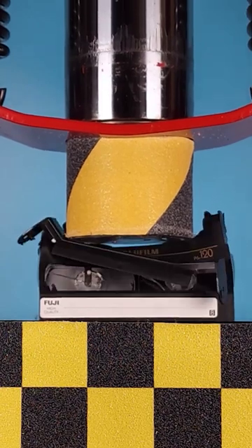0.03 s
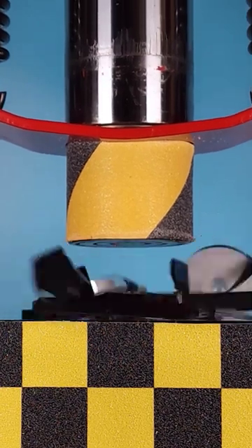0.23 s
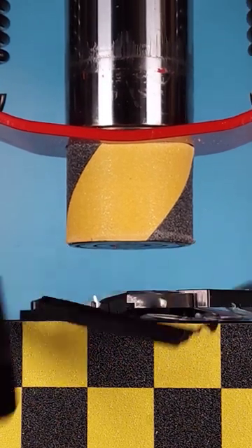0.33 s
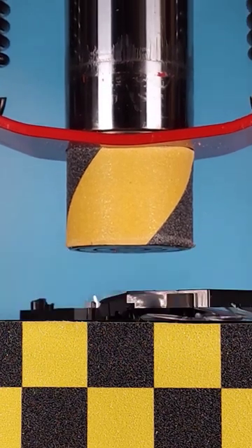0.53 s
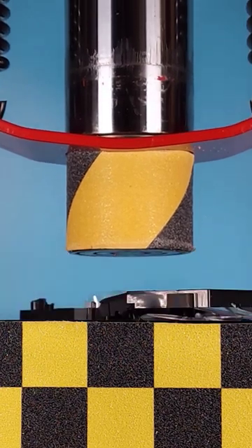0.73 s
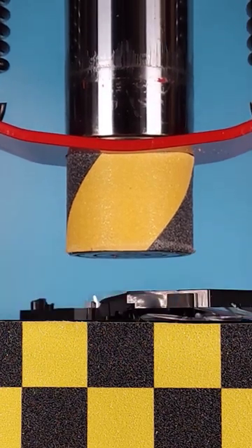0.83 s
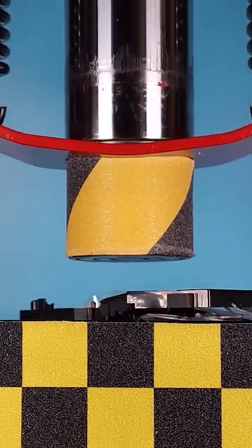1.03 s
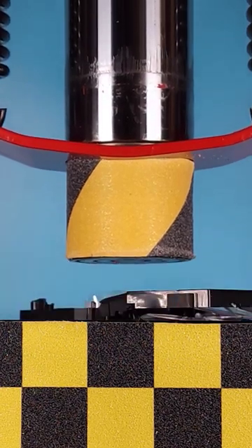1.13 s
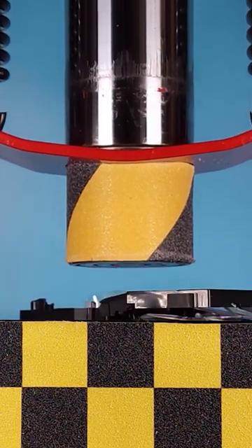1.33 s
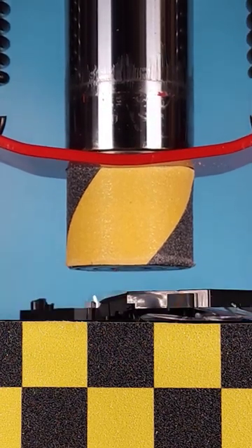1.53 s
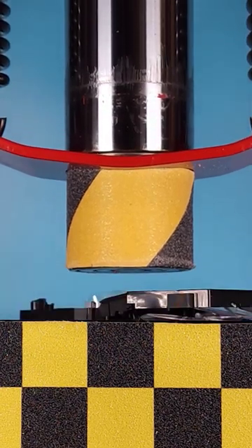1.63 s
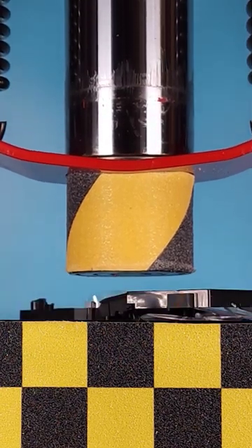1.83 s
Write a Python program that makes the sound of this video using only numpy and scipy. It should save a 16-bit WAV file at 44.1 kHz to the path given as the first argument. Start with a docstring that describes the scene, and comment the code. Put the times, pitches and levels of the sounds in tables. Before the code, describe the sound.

Sharp crack of a plastic cassette shattering in a hydraulic press, over a steady pump whine.

```python
"""A plastic cassette bursts under a hydraulic press in a workshop. Each crack is a snap and a run of
tiny fractures that ring the shell. It gives way with a thud, shards scatter, pieces slap onto the
steel bed and the frame rumbles on. The flattened wreck keeps ticking, clacking and pinging under the
ram, while the pump behind it hums, whines and hisses, slowly growing louder."""
import sys
import numpy as np
from scipy import signal
from scipy.fft import rfft, irfft
from scipy.io import wavfile
from scipy.ndimage import uniform_filter1d

SR = 44100
rng = np.random.default_rng(int(sys.argv[2]) if len(sys.argv) > 2 else 0)


def output_pcm(signal):
    """Save a mono or channel-first signal as 16-bit PCM at the path in sys.argv[1].

    Samples are clipped to [-1, 1] before scaling.
    """
    pcm = np.clip(np.atleast_2d(signal).T, -1, 1) * 32767
    wavfile.write(sys.argv[1], SR, np.round(pcm).astype(np.int16))


N = 83790
T = np.arange(N) / SR
HZ, BINS = np.fft.rfftfreq(N, 1 / SR), np.fft.rfftfreq(4096, 1 / SR)  # for noise, for filters
BASS_HZ, TOP_HZ = 795, 16000


def amp(db):
    """Decibels to gain."""
    return 10 ** (np.asarray(db) / 20)


def unit(x):
    """Scales to energy 1."""
    return x / np.sqrt(np.sum(x ** 2, -1, keepdims=True) + 1e-20)


def curve(points, hz):
    """Reads a curve on a log-frequency axis."""
    freqs, values = np.transpose(points)
    return np.interp(np.log(hz + 1), np.log(freqs + 1), values)


def add(mix, start, sound):
    """Mixes a sound in at a start time in seconds."""
    part = mix[:, max(round(start * SR), 0):][:, :sound.shape[-1]]
    part += sound[..., :part.shape[1]]


def convolve(x, response):
    """Filters each channel, cut to the scene's length."""
    return signal.fftconvolve(np.atleast_2d(x), np.atleast_2d(response), axes=1)[:, :N]


def colour(db, size=2048):
    """Minimum-phase impulse response of an EQ curve; energy 1."""
    log_gain = np.log(amp(np.r_[db, db[-2:0:-1]]))
    spectrum = np.exp(np.conj(signal.hilbert(log_gain)))
    return unit(irfft(spectrum[:len(db)])[:size])


def whiten(x, width_hz):
    """Takes the broad chance colour out of a rattle or a set of reflections; energy 1."""
    power = uniform_filter1d(abs(rfft(x)) ** 2, max(int(width_hz * len(x) / SR), 3))
    inverse_eq = colour(-10 * np.log10(abs(power) + 1e-12))
    return unit(convolve(x, inverse_eq)[0, :len(x)])


def stereo_noise():
    """Left and right noise spectra, centred in the bass and wide in the treble."""
    left, other = rfft(rng.standard_normal((2, N)))
    shared = 1 / (1 + (HZ / BASS_HZ) ** 2)
    return np.array([left, shared * left + np.sqrt(1 - shared ** 2) * other])


def noise_bed(eq):
    """Steady stereo noise through an EQ curve; RMS 1."""
    return np.sqrt(N) * unit(irfft(stereo_noise() * amp(curve(eq, HZ))))


def widen(x, smear_s=0.00035):
    """The treble reaches left and right by slightly different paths."""
    paths = rfft(irfft(stereo_noise()) * np.exp(-T / smear_s))
    allpass = irfft(paths / abs(paths))
    return convolve(x, np.roll(allpass, 20, axis=1)[:, :SR // 20])


def splinters(decay_s, per_second=5000, snap=0.37, size=6000):
    """One snap followed by a dying run of tiny fractures."""
    fractures = rng.random(size) < per_second / SR
    run = unit(fractures * rng.standard_normal(size) * np.exp(-T[:size] / decay_s))
    run[0] += snap
    return 20 * whiten(run, width_hz=280)


# The room's tail. Each row: frequency in Hz, T60 in seconds.
ROOM_DECAY = [(100, 0.33), (400, 0.41), (1200, 0.56), (3000, 0.6), (7000, 0.54), (14000, 0.47)]

def workshop(x, near_t60=0.086, rise_s=0.0015):
    """The direct sound, quick reflections inside the press frame, then the tail of the room."""
    near = unit(irfft(stereo_noise()) * amp(-60 * T / near_t60))
    hz, t, bands = signal.stft(irfft(stereo_noise()), SR, nperseg=256)
    bands *= amp(-60 * t / curve(ROOM_DECAY, hz)[:, None])
    tail = signal.istft(bands, SR, nperseg=256)[1][:, :N]
    tail = unit(tail * (1 - np.exp(-T / rise_s)))
    paths = (T == 0) + amp(-0.5) * near + amp(-11.5) * tail
    return amp(1.5) * convolve(x, [whiten(side, width_hz=96) for side in paths])


# When each pitch of the whine swells. Each row: frequency in Hz, moment in the stroke in turns.
WHINE_TIMING = [(4650, 0.18), (4900, 0.0053), (5350, -0.27), (5750, 0.323), (6400, 0.427), (7200, 0.254)]

def stroke_phases(hz, smear_turns=0.1, wide_hz=1800):
    """Phases in turns: the whine chirps down, then swells higher up; other buzz fills the stroke."""
    whine = (hz > WHINE_TIMING[0][0]) & (hz < WHINE_TIMING[-1][0])
    timed = -np.cumsum(curve(WHINE_TIMING, hz)) + smear_turns * rng.standard_normal(len(hz))
    side = np.where(whine, 1, rng.choice([-1, 1], len(hz)))
    lag = side * np.minimum(hz / wide_hz, 1) / 8  # left and right are out of step in the treble
    return np.where(whine, timed, rng.random(len(hz))) + np.array([lag, -lag])


def shaft_loop(partials, turns, size=8192):
    """Loops one turn of the shaft as a stereo wavetable."""
    cycle = irfft(partials, size) * size / np.sqrt(2)
    return np.array([np.interp(turns, np.arange(size) / size, side, period=1) for side in cycle])


# How hard the pump works. Each row: time in seconds, gain in dB.
PUMP_EFFORT = [(0, -5.5), (.45, -6.5), (.8, -3), (1.1, -2), (1.4, -1.5), (1.65, 0.5), (1.9, 2)]
# Its standout partials. Each row: harmonic number, left and right level in dB before the effort gain.
PUMP_PARTIALS = [(1, -60, -63.5), (2, -51.5, -48.5), (9, -76, -70), (10, -64.5, -68), (45, -61, -58),
                 (46, -61, -59), (47, -64, -63), (80, -57, -50), (81, -61, -49), (82, -61, -50),
                 (83, -69, -56), (84, -55, -54), (86, -59, -57), (99, -50, -61), (106, -50, -62),
                 (107, -48, -65), (110, -52, -53), (118, -56, -61), (119, -58, -66)]
# The buzz between them. Each row: frequency in Hz, level in dB before scatter and effort gain.
PUMP_BUZZ = [(180, -77.5), (240, -84), (300, -76.5), (420, -84.5), (500, -72), (680, -84), (880, -97),
             (1080, -82), (1900, -82), (2300, -71.5), (3300, -75), (4650, -70), (5050, -63.5), (5550, -67),
             (5900, -70), (6600, -73), (7400, -72), (9500, -81.5), (10500, -97), (14000, -91),
             (15500, -104)]
# The tone of the oil hiss. Each row: frequency in Hz, relative level in dB.
OIL_EQ = [(25, -1), (70, 16), (150, 4), (230, -4.5), (450, -11.5), (900, -6), (1750, -12), (2600, 4.5),
          (3400, -2), (5000, 2), (6600, 8), (7700, -13), (10000, -4.5), (14000, -24), (15000, -23),
          (16000, -51)]

def pump(shaft_hz=59.77, waver_hz=0.023, scatter_db=6, hiss_db=-51.5, hiss_pulse=0.07):
    """Hum, a comb of whining partials and pulsing oil hiss, all rising with effort."""
    effort_db = np.interp(T, *np.transpose(PUMP_EFFORT))
    drift = np.interp(T, np.linspace(0, T[-1], 20), rng.standard_normal(20))
    turns = np.cumsum(shaft_hz + waver_hz * drift) / SR
    hz = np.arange(TOP_HZ // shaft_hz) * shaft_hz
    db = curve(PUMP_BUZZ, hz) + scatter_db * rng.standard_normal((2, len(hz)))
    for harmonic, left_db, right_db in PUMP_PARTIALS:
        db[:, round(harmonic)] = left_db, right_db
    partials = amp(db) * np.exp(2j * np.pi * stroke_phases(hz)) * (hz > 0)
    hum = shaft_loop(partials * (hz < BASS_HZ), turns) * amp(0.47 * effort_db)  # swells less
    whine = shaft_loop(partials * (hz >= BASS_HZ), turns) * amp(effort_db)
    pulse = 1 + hiss_pulse * np.sin(2 * np.pi * turns)
    hiss = noise_bed(OIL_EQ) * amp(hiss_db + effort_db) * pulse
    return hum + whine + hiss


# The frame's rumbles. Each row: start in seconds, level in dB, T60 in seconds.
FRAME_RUMBLES = [(0, -46, 0.54), (.225, -53.5, 2.65)]
# Their deep tone. Each row: frequency in Hz, relative level in dB.
FRAME_EQ = [(25, -14), (60, 12), (130, -9), (175, 5), (220, -3.5), (290, 2.5), (370, -3), (450, -20),
            (900, -31), (3000, -48)]

def frame_rumble():
    """Low resonances of the press frame die away after each release of load."""
    envelope = sum(amp(db - 60 * np.maximum(T - start, 0) / t60) * (T >= start)
                   for start, db, t60 in FRAME_RUMBLES)
    return envelope * noise_bed(FRAME_EQ)


# Small clear pings. Each row: start in seconds, pitch in Hz, level in dB, T60 in seconds.
PART_PINGS = [(0.952, 1175, -47, 0.16), (1.032, 1246, -55, 0.15), (1.639, 848, -54.5, 0.43),
              (1.64, 1280, -51, 0.19), (1.641, 4290, -50, 0.36), (1.791, 1568, -51.5, 0.19),
              (1.792, 3080, -44, 0.1)]

def loose_parts():
    """Each small loose part rings at its own pitch as it shifts."""
    out, t = np.zeros((2, N)), T[:16000]
    right_phases = rng.uniform(-1.66, 1, len(PART_PINGS))
    for (start, hz, db, t60), phase in zip(PART_PINGS, right_phases):
        tone = np.sin(2 * np.pi * hz * t + np.array([[0], [phase]]))
        add(out, start, amp(db - 60 * t / t60) * tone)
    return out


# Dry clacks. Each row: start in seconds, pitch in Hz, relative level in dB, decay in seconds.
FRAGMENT_CLACKS = [(0.093, 7480, -32, .002), (.167, 2350, -29.5, .003), (0.473, 3570, -49.5, .003),
                   (0.5374, 6500, -40.5, .002), (0.603, 3300, -52, 0.0036), (0.687, 3400, -53.5, .008),
                   (.959, 7200, -42, 0.0049), (0.971, 7150, -38, .005), (0.99, 6370, -37, .009),
                   (1.024, 3080, -48, 0.0092), (1.151, 3850, -48.5, .003), (1.79, 6600, -32.5, .002),
                   (1.792, 5040, -32.5, 0.0087), (1.798, 6440, -34.5, .003)]

def fragment_clacks(width_hz=430):
    """Fragments knock together, each rattling briefly in its own broad resonance."""
    out = np.zeros((2, N))
    for start, hz, db, decay in FRAGMENT_CLACKS:
        resonance = colour(-20 * np.log10(1 + (2 * (BINS - hz) / width_hz) ** 2))
        add(out, start, 20 * amp(db) * unit(convolve(splinters(decay), resonance)))
    return out


# Thuds as the bed takes the released load, slaps as the pieces land on it.
# Each row: start in seconds, relative level in dB, decay in seconds.
BED_THUDS = [(.2215, -26, 0.0066), (.256, -36, 0.0089)]
PIECE_SLAPS = [(.2525, -29.5, 0.0093), (.263, -30, 0.0072)]
# The boomy bed and the boxy pieces. Each row: frequency in Hz, relative level in dB.
BED_EQ = [(25, -4), (60, 4.5), (130, 6.5), (190, -1.5), (260, 8.5), (340, 4), (430, 4), (560, -20),
          (900, -10.5), (1200, -1), (1500, -16), (4000, -54)]
PIECE_EQ = [(150, -37), (480, -14), (630, -0.5), (950, -7.5), (1250, -11), (2100, -5.5), (3000, -17),
            (6000, -17), (15000, -44)]

def impacts(hits, eq):
    """Dull rattling blows with the colour of what is struck."""
    out, tone = np.zeros((2, N)), colour(curve(eq, BINS))
    for start, db, decay in hits:
        add(out, start, amp(db) * convolve(splinters(decay), tone))
    return out


# The brittle tone of shards and cracks alike. Each row: frequency in Hz, relative level in dB.
SHELL_EQ = [(60, -22), (300, -23), (550, -24), (850, -17.5), (1250, -14), (1750, -11.5), (2350, -8.5),
            (2900, -9), (3500, -9.5), (4500, -4.5), (5200, -4.5), (5800, -4.5), (6600, 4.5), (7500, -3.5),
            (8400, -9.5), (9500, -12.5), (14000, -9.5), (15000, -18), (16000, -42)]

def flying_shards(start=0.2, fade_s=0.057, per_second=230, count=36):
    """Bits of shell scatter at the burst, ticking left and right as they fade."""
    out, tone = np.zeros((2, N)), colour(curve(SHELL_EQ, BINS))
    jitter, strength, side = rng.random((count, 3)).T
    delays = (np.arange(count) + jitter) / per_second
    gains = strength ** 2 * np.exp(-delays / fade_s)
    for delay, gain, pan in zip(delays, gains, side * np.pi / 2):
        add(out, start + delay, gain * np.outer([np.cos(pan), np.sin(pan)], tone))
    return out


# First snaps, the burst, then late ticks. Each row: start in seconds, relative level in dB,
# decay in seconds, body shelf in dB, treble shelf in dB, left over right in dB.
SHELL_CRACKS = [(.001, -28, 0.034, 2.5, -3.5, 1.5), (0.048, -39.5, 0.026, 4.5, -8, 0),
                (0.078, -37.5, 0.0084, 5.5, -4, -1), (0.0925, -35, 0.0032, -2, -2, 2),
                (0.1655, -21.5, 0.004, 1.5, -3, -0.5), (0.2208, -14, 0.005, -6, -2, 3),
                (0.2252, -13.5, 0.0033, -3, -4, -4.5), (0.2303, -15, 0.003, -5, 2, 2.5),
                (0.2335, -15, 0.004, -5, 2, 2.5), (.380, -45, .004, -8, -7, 6),
                (0.465, -46.5, 0.0033, -4, -6, 5), (0.533, -43.5, 0.0035, -10, 6.5, -0.5),
                (0.596, -40, 0.0079, -4, -7, 1.5), (0.679, -41, 0.011, -2.5, -4.5, -1),
                (0.9568, -33, 0.0014, 7, 18.5, 0), (0.962, -39.5, 0.011, -4, 8, -6),
                (0.9837, -34, 0.0069, -3, 7, 1), (1.027, -39, 0.0055, -3, 9, -0.5),
                (1.152, -44.5, 0.009, -13, 2, -2), (1.243, -49, 0.0087, 0, 18, -3),
                (1.6394, -27.5, 0.0067, -3.5, 3, 2), (1.79, -28, 0.0018, -3, 9.5, 4),
                (1.7955, -33, 0.0067, -1.5, 6, -3)]
# The shell's modes. Each row: pitch in Hz, relative level in dB, T60 in seconds.
SHELL_RING = [(2153, -14, .15), (4301, -8, .12), (4548, -5, .1), (5176, -5, .12), (6217, -3, .1),
              (6832, -2, .08), (7230, -2, .1), (7487, 0, .11)]

def shell_cracks(body_hz=2350, treble_hz=8900, ring_db=-22):
    """Fractures sound through the cassette's shell and leave its modes ringing."""
    out, t = np.zeros((2, N)), T[:12000]
    body = 1 / (1 + (BINS / body_hz) ** 4)
    treble = 1 - 1 / (1 + (BINS / treble_hz) ** 8)
    for start, db, decay, body_db, treble_db, pan_db in SHELL_CRACKS:
        tone = colour(curve(SHELL_EQ, BINS) + body_db * body + treble_db * treble)
        pan = amp([[pan_db / 2], [-pan_db / 2]])
        add(out, start, amp(db) * pan * convolve(splinters(decay), tone))
    phases = rng.uniform(0, 2 * np.pi, (len(SHELL_RING), 2, 1))
    ring = sum(amp(db - 60 * t / t60) * np.sin(2 * np.pi * hz * t + phase)
               for (hz, db, t60), phase in zip(SHELL_RING, phases))
    return out + amp(ring_db) * convolve(out, unit(ring))


# Where the breaking plastic sits in the image. Each row: frequency in Hz, left over right in dB.
WRECK_PAN = [(100, -3.5), (500, 0), (1200, -2.5), (2400, -0.5), (4500, -3), (12000, -0.5)]

def scene():
    """Breaking plastic in the room and loose fragments close by, over the pump."""
    plastic = widen(shell_cracks() + flying_shards())
    wreck = workshop(plastic + impacts(BED_THUDS, BED_EQ) + impacts(PIECE_SLAPS, PIECE_EQ))
    lean_db = curve(WRECK_PAN, BINS) / 2
    wreck = convolve(wreck, [colour(lean_db), colour(-lean_db)])
    return wreck + widen(fragment_clacks()) + loose_parts() + frame_rumble() + pump()


def record(dry, ceiling=0.85):
    """A soft clip rounds the peaks, then a low-pass trims the very top."""
    rounded = ceiling * np.tanh(dry / ceiling)
    lowpass = signal.firwin(255, TOP_HZ, window=("kaiser", 8), fs=SR)
    return signal.oaconvolve(rounded, lowpass[None], "same")


dry = scene()
out = record(dry)
output_pcm(out)
```